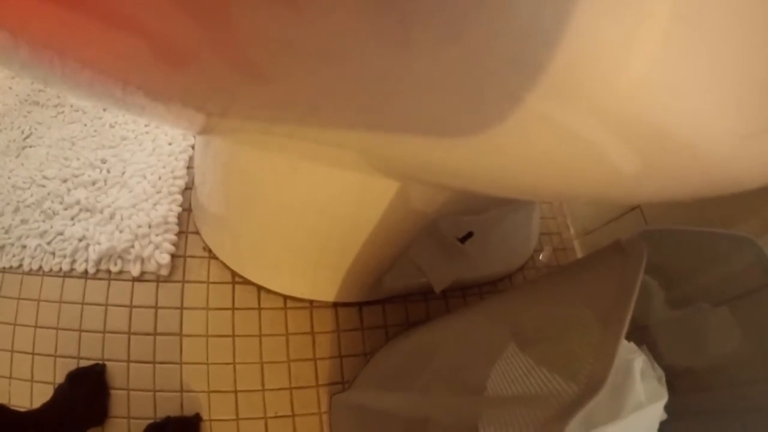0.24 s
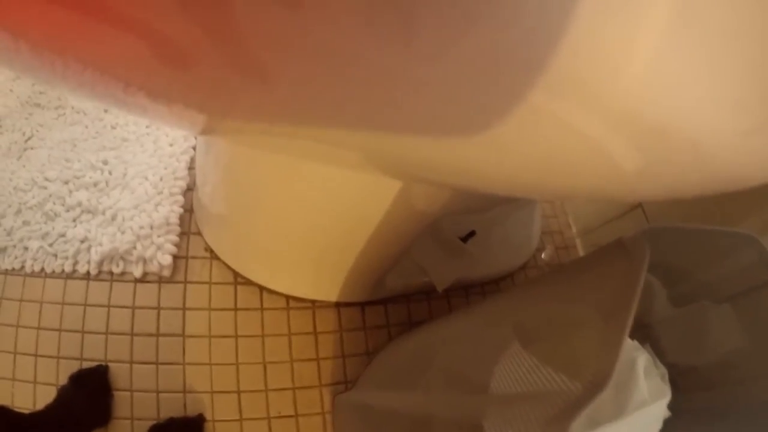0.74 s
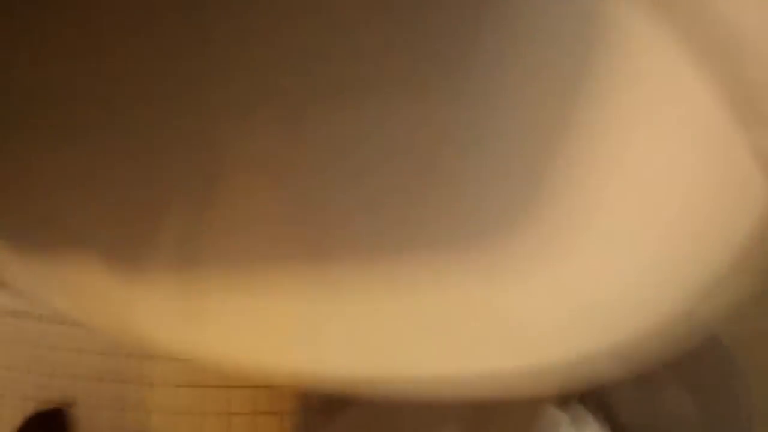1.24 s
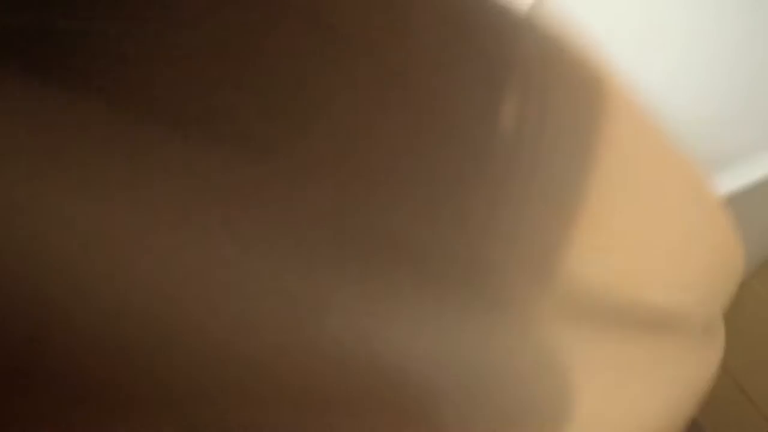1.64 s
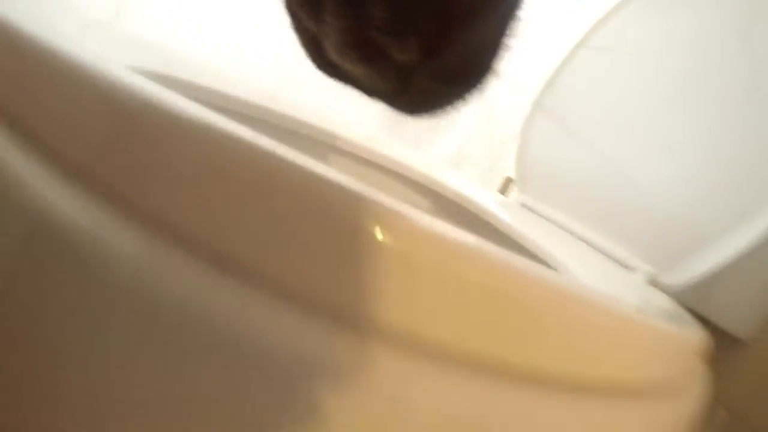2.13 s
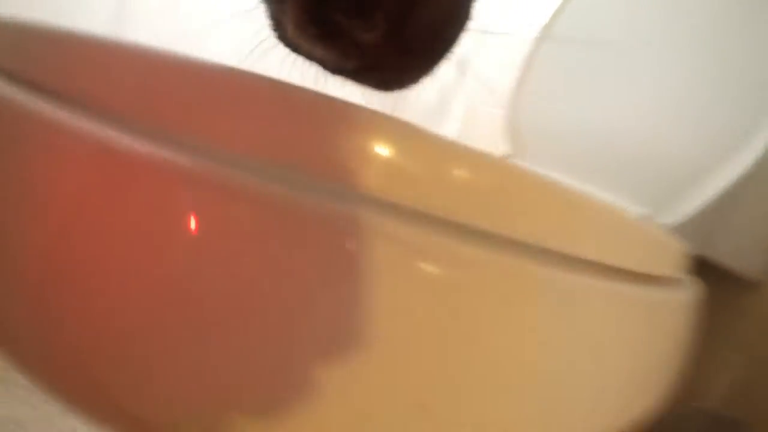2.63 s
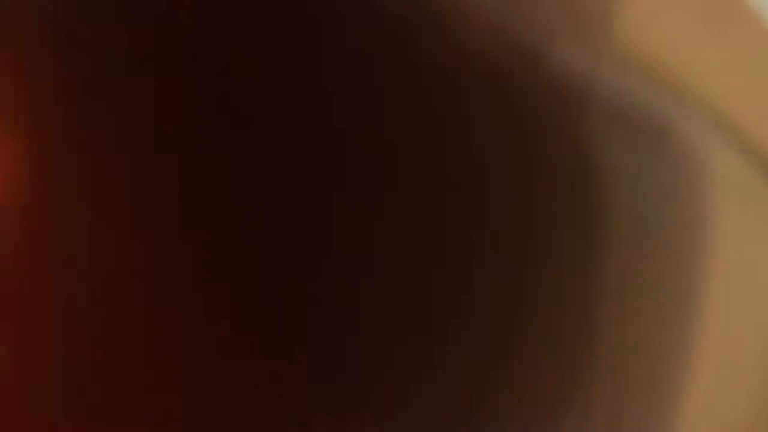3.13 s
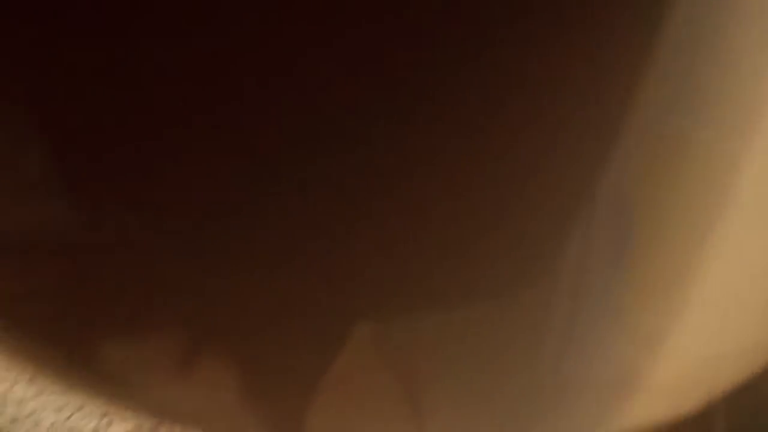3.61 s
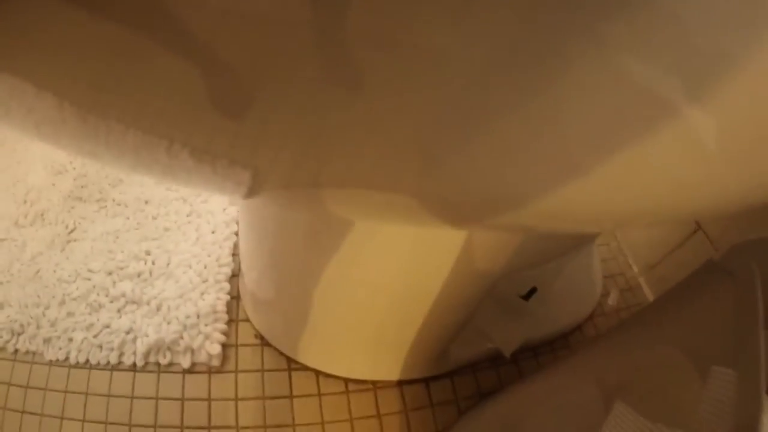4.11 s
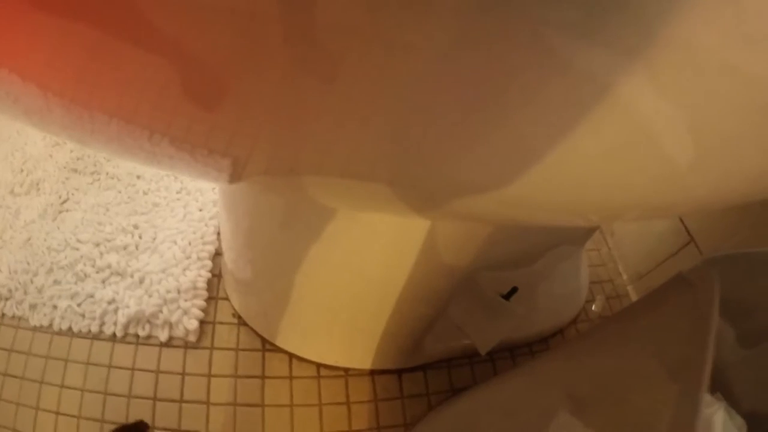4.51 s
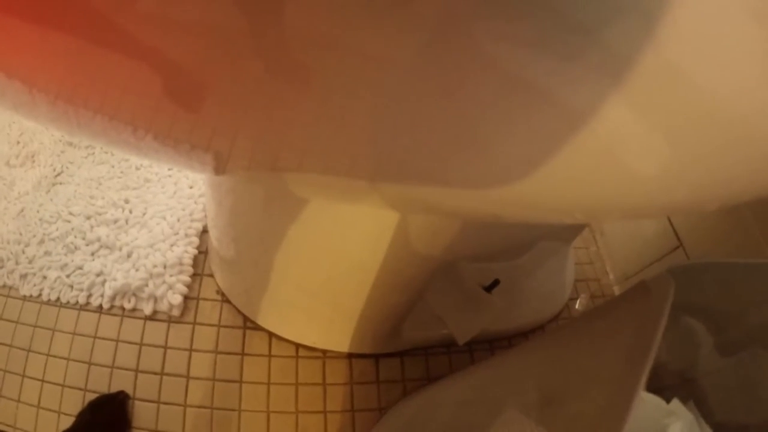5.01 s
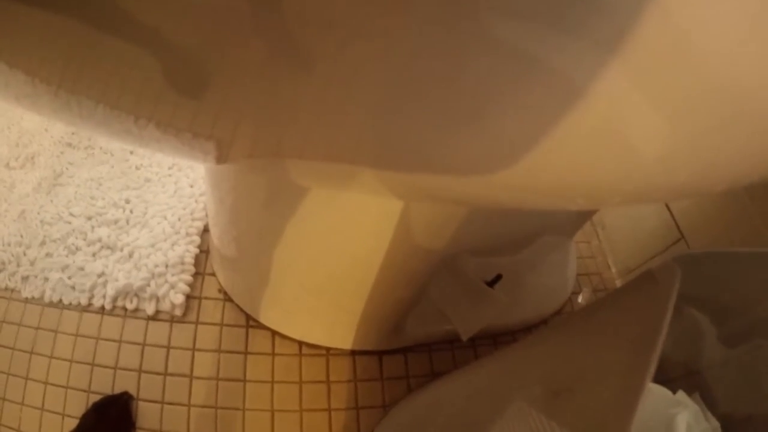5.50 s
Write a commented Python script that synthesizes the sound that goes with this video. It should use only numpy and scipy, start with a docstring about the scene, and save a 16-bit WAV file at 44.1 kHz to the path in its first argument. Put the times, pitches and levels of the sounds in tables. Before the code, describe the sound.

Right against a toilet bowl in a small tiled bathroom, a dog laps about three times a second with hollow wet pops and low bumps. The microphone's casing rubs the bowl, knocks and chatters on the rim, then goes nearly quiet with tiny wet smacks. A very hard knock overloads, a groaning scrape follows, and softer, swishing licks continue over handling rumble and faint hiss.

```python
"""Tiled bathroom, camera microphone right against a toilet bowl: a dog laps, about three licks a second.
Each lick is a slow low push, with ringing air-pocket pops or a swish of hollow, grainy noise.
The casing then rubs along the bowl, knocks on the rim as decaying modes, bounces, overloads the microphone
and chatters. Tiny bubbles smack faintly, more knocks land, a groaning scrape comes down the rim, and the
lapping goes on. Hand rumble, rustle and a faint steady hiss lie underneath throughout."""
import sys
import numpy as np
from scipy import signal
from scipy.fft import rfft, irfft
from scipy.io import wavfile

SR = 44100
rng = np.random.default_rng(int(sys.argv[2]) if len(sys.argv) > 2 else 0)


def bounce(signal):
    """Save signal as a 16-bit WAV file at the path given by the first command-line argument."""
    frames = np.transpose(np.atleast_2d(signal))
    limited = np.clip(frames, -1, 1)
    pcm = np.round(limited * 32767).astype(np.int16)
    wavfile.write(sys.argv[1], SR, pcm)


N = 253575
TIME = np.arange(N) / SR
BRIEF = TIME[:8192]  # time axis of one short sound, seconds


def amp(db):
    """Decibels to gain."""
    return 10 ** (np.asarray(db) / 20)


def unit_rms(x):
    """Scales to an rms of one."""
    return x / np.sqrt(np.mean(x ** 2) + 1e-20)


def unit_peak(x):
    """Scales to a peak of one."""
    return x / (abs(x).max() + 1e-20)


def noise(count=N):
    """White noise."""
    return rng.standard_normal(count)


def decay(t, t60):
    """A gain that falls by 60 dB in t60 seconds."""
    return amp(-60 * t / t60)


def add(mix, s, sound):
    """Mixes a sound in at s seconds."""
    part = mix[max(round(s * SR), 0):][:len(sound)]
    part += sound[:len(part)]


def spectrum_db(points, hz):
    """Reads a spectrum on a log-frequency axis."""
    f, db = np.transpose(points)
    return np.interp(np.log(hz + 1), np.log(f + 1), db)


def coloured(x, points, bumps=()):
    """Gives x a broad spectrum with resonant bumps on it, at an rms of one."""
    hz = np.fft.rfftfreq(len(x), 1 / SR)
    db = spectrum_db(points, hz)
    for centre, width, height_db in bumps:
        db = db + height_db * np.exp(-2 * ((hz - centre) / width) ** 2)
    return unit_rms(irfft(rfft(x) * amp(db), len(x)))


def click(points, corner_hz):
    """A causal (minimum-phase) click of the given spectrum, duller above the corner."""
    hz = abs(np.fft.fftfreq(len(BRIEF), 1 / SR))
    log_gain = np.log(amp(spectrum_db(points, hz)) / (1 + (hz / corner_hz) ** 2))
    return np.fft.ifft(np.exp(np.conj(signal.hilbert(log_gain)))).real


def wander(rate_hz):
    """Slow chance with an rms of one."""
    hz = np.fft.rfftfreq(N, 1 / SR)
    return unit_rms(irfft(rfft(noise()) * np.exp(-(hz / rate_hz) ** 2), N))


def grainy(grain_db, grain_hz=900):
    """Noise that comes in tiny clumps."""
    return noise() * amp(grain_db * wander(grain_hz))


def whistle(glide, width_hz):
    """Noise in one narrow resonance that follows a glide."""
    hz = np.interp(TIME, *np.transpose(glide))
    turn = np.exp(2j * np.pi * np.cumsum(hz) / SR)
    return unit_rms((turn * (wander(width_hz) + 1j * wander(width_hz))).real)


def stroke(start, end, db, growth_db=0, fade=0.028):
    """A gain that fades in, holds while growing by growth_db each second, and fades out."""
    outside = np.maximum(start - TIME, 0) + np.maximum(TIME - end, 0)
    held_db = db + growth_db * (np.clip(TIME, start, end) - start)
    return amp(held_db) * np.exp(-(outside / fade) ** 2)


def swell(s, half_length, db, shape=1.7):
    """A gain that rises to a peak at s seconds and falls again."""
    return amp(db) * np.exp(-abs((TIME - s) / half_length) ** shape)


# Licks at the bowl. Each row: time in seconds, push level in dB, push swing in Hz, swish delay in seconds,
# swish half-length in seconds, swish level in dB, draw-back level in dB.
LICKS = [(0.0, -15, 27.5, 0.038, 0.13, -51.5, -93), (0.337, -12.5, 24.5, -0.02, 0.034, -52.5, -62),
         (0.681, -14, 25.4, -0.018, 0.017, -46, -58), (4.137, -52, 25, -0.05, 0.2, -49, -57),
         (4.323, -27.5, 24.8, -0.074, 0.049, -40.5, -49), (4.633, -22, 24.1, 0.025, 0.091, -35, -51),
         (4.946, -15, 23, 0.021, 0.074, -32.5, -37), (5.267, -12, 22.2, 0.044, 0.041, -37, -37),
         (5.668, -14.5, 22.9, 0.039, 0.047, -34, -60)]
# Jolts of the hand on the camera. Each row: time in seconds, level in dB, swing in Hz.
JOLTS = [(0.88, -27.5, 33.3), (1.112, -16, 28.5), (1.383, -19, 45), (2.897, -35, 29), (3.226, -31, 30)]


def pushes(cycles=0.83, slop_db=-31):
    """Each push rocks the bowl and camera through a slow swing or two, with a dull slop under it."""
    slop_colour = [(60, 0.5), (130, 2.0), (300, -17.0), (700, -21.0), (1500, -29.5), (4000, -70.0)]  # (Hz, dB)
    slop = amp(slop_db) * coloured(noise(), slop_colour)
    out = np.zeros(N)
    for s, db, hz, *_ in LICKS + JOLTS:
        since = TIME - s
        swing = np.cos(2 * np.pi * hz * since)
        out += amp(db) * (swing + slop) * np.exp(-(since * hz / cycles) ** 2)
    return out


# Wet pops of the tongue. Each row: start in seconds, peak of the air pocket in dB, pitch in Hz,
# level of the splash relative to the pocket in dB.
POPS = [(0.016, -18.5, 890, -3), (0.035, -24, 790, -2.5), (0.297, -36, 1093, -8), (0.347, -17, 990, 1),
        (0.363, -21.5, 1100, -2), (0.374, -29.5, 950, -16), (0.455, -36.5, 2470, -14.5),
        (0.589, -39, 990, -7), (0.639, -23.5, 1120, -14.5), (0.692, -11.5, 1100, -8.5),
        (0.715, -17.5, 1050, -9), (0.771, -31.5, 1100, -8), (4.123, -36, 1660, -3)]
# Colour of the splash in the bowl. Each row: frequency in Hz, level in dB.
SPLASH_COLOUR = [(180, -3), (300, -16.5), (469, -3.5), (630, -7.5), (778, -0.5), (1060, -1.5),
                 (1930, -12.5), (2300, -7.5), (3090, -43), (5000, -40), (6500, -57), (11000, -120)]


def pops(rise_s=0.00048, splash_t60=0.04):
    """A pocket of air under the tongue rings for a few cycles; a splash builds and dies in the bowl."""
    out = np.zeros(N)
    pocket_shape = (BRIEF / rise_s) ** 2 * np.exp(-BRIEF / rise_s)
    splash_shape = decay(BRIEF, splash_t60) * (1 - np.exp(-BRIEF / rise_s))
    for s, db, hz, splash_db in POPS:
        pocket = unit_peak(pocket_shape * np.sin(2 * np.pi * hz * BRIEF))
        splash = coloured(noise(len(BRIEF)), SPLASH_COLOUR) * splash_shape
        add(out, s, amp(db) * (pocket + amp(splash_db) * splash))
    return out


def tongue():
    """Level of the tongue's sliding: a swish with each lick and a softer draw-back after it."""
    draw_back_s, draw_back_share = 0.21, 0.23  # lag after the swish; half-length as a share of the lick's span
    longest_lick_s = 0.83  # after a longer pause the tongue still draws back at this pace
    starts = [row[0] for row in LICKS]
    spans = np.minimum(np.diff(starts, append=np.inf), longest_lick_s)
    level = np.zeros(N)
    for (s, _, _, delay, half, swish_db, back_db), span in zip(LICKS, spans):
        level += swell(s + delay, half, swish_db)
        level += swell(s + delay + draw_back_s, draw_back_share * span, back_db)
    return level


# Colour of the tongue's hiss. Each row: frequency in Hz, level in dB.
SWISH_COLOUR = [(120, -46), (200, -17.5), (360, -21.5), (677, -18.5), (1200, -7), (1960, -2.5), (2290, 2),
                (3530, -11), (4120, -11.5), (4660, -17.5), (6060, -21), (6750, -11), (8000, -44),
                (10400, -89), (17600, -120)]
# Colour of the fine fizz, shared with the rub. Each row: frequency in Hz, level in dB.
FIZZ_COLOUR = [(6000, -23.5), (7800, -1), (9200, -7.5), (11000, 0.5), (13200, -10), (14500, -6.5),
               (16000, -8)]
# Resonances of the hollow, shared with the rustle. Each row: centre in Hz, width in Hz, height in dB.
HOLLOW = [(1131, 240, 3), (2340, 110, 2), (3073, 480, 2.5), (4148, 510, 4.5), (5330, 1800, 2),
          (7170, 170, 5.5)]


def swishes(fizz_db=-17, flutter_db=2.0):
    """The wet tongue slides: grainy hiss in a hollow, with a fine fizz on top."""
    body = coloured(grainy(grain_db=1.5), SWISH_COLOUR, HOLLOW)
    fizz = amp(fizz_db) * coloured(grainy(grain_db=2.0), FIZZ_COLOUR)
    return (body + fizz) * tongue() * amp(flutter_db * wander(30))


# Movement of the hand on the camera. Each row: time in seconds, amount of movement in dB.
HAND = [(0, -39), (1.05, -40.5), (1.23, -32.5), (1.42, -46.5), (1.9, -59.5), (2.25, -61), (2.83, -52),
        (3.2, -47.5), (3.4, -59.5), (4.6, -44.5), (5.75, -35)]
# Faint brushes of fur and fingers. Each row: time in seconds, level in dB before the rustle's own trim,
# half-length in seconds.
BRUSHES = [(1.574, -54.5, 0.054), (2.06, -67.5, 0.019), (2.357, -62.5, 0.012), (2.471, -65, 0.022),
           (2.611, -64, 0.015), (2.802, -65.5, 0.057), (3.058, -63.5, 0.077), (3.216, -53.5, 0.012),
           (4.845, -43, 0.013)]
# Colour of the rustle. Each row: frequency in Hz, level in dB.
RUSTLE_COLOUR = [(120, -25.5), (200, -7), (277, -9), (880, -13), (1290, -7.5), (2060, -4.5), (2510, -9),
                 (3470, -15.5), (4010, -16.5), (15000, -30)]
# Colour of the rumble. Each row: frequency in Hz, level in dB.
RUMBLE_COLOUR = [(10, 1), (22, 11.5), (40, 1.5), (65, -3), (100, -16), (160, -23.5), (300, -36.5),
                 (600, -43.5), (1500, -72)]
# Colour of the steady hiss. Each row: frequency in Hz, level in dB.
FLOOR_COLOUR = [(59, -34.5), (100, -8.5), (434, -22.5), (1960, -13.5), (3110, -20), (3530, -26.5),
                (3920, -18.5), (4940, -28), (11700, -38.5), (15000, -55)]


def handling(rustle_db=-2.0, rumble_db=5, flutter_db=1.0, grip_db=-30, rustle_per_rumble=0.7, floor_db=-74.5):
    """The hand on the camera rustles and rumbles over a faint steady hiss."""
    hand_db = np.interp(TIME, *np.transpose(HAND))
    grip = amp(grip_db + rustle_per_rumble * hand_db)  # rustle grows less in dB than the movement does
    brushes = sum(swell(s, half, db) for s, db, half in BRUSHES)
    rustle = coloured(grainy(grain_db=2.0), RUSTLE_COLOUR, HOLLOW) * amp(rustle_db + flutter_db * wander(35))
    rumble = coloured(noise(), RUMBLE_COLOUR) * amp(hand_db + rumble_db)
    floor = amp(floor_db) * coloured(noise(), FLOOR_COLOUR)
    return rustle * (grip + brushes) + rumble + floor


# Small bright ticks. Each row: start in seconds, level in dB before the common trim.
TICKS = [(0.808, -38.5), (2.3486, -46.5), (2.4851, -39), (2.9637, -26.5), (2.9851, -32.5), (3.4878, -56),
         (4.4797, -38), (4.8777, -30.5), (4.92, -27.5), (5.519, -27)]
# Colour of the ticks. Each row: frequency in Hz, level in dB.
TICK_COLOUR = [(800, -16), (2000, -0.5), (4000, 7.5), (6500, 1.5), (9000, -3.5), (15000, -27)]


def ticks(tail_db=-11, trim_db=-3, tail_t60=0.04):
    """Tiny bright clicks, each with a short tail of decaying noise."""
    out = np.zeros(N)
    tick = unit_peak(click(TICK_COLOUR, 17000))
    for s, db in TICKS:
        tail = coloured(noise(len(BRIEF)), TICK_COLOUR) * amp(tail_db) * decay(BRIEF, tail_t60)
        add(out, s, amp(db + trim_db) * (tick + tail))
    return out


# Colour of the casing rubbing on the bowl. Each row: frequency in Hz, level in dB.
RUB_COLOUR = [(120, -45), (200, -8), (281, -22.5), (908, -16.5), (2120, -1.5), (2290, 0), (2590, -10.5),
              (4180, -11.5), (4730, -24), (6860, -23.5), (8000, -34), (10400, -62.5), (17600, -120)]


def rub(body_db=-1, fizz_db=-32, sheen_db=2, squeak_db=-7, catch_s=1.1555, catch_db=10, catch_time=0.0025,
        judder_db=0.4):
    """The casing rubs along the bowl as it is lifted: rough noise, a falling squeak and one brief catch."""
    end_s = 1.238
    touch = stroke(0.97, end_s, -40.5, fade=0.025)  # a light touch
    press = stroke(1.019, end_s, -32, growth_db=22, fade=0.007)  # a firm press that grows
    pressure = touch + press
    squeak = whistle([(1.05, 2410), (1.15, 2330), (1.21, 2044)], width_hz=130)  # (s, Hz)
    body = amp(body_db) * coloured(grainy(grain_db=1.5), RUB_COLOUR) + amp(squeak_db) * squeak
    sheen_colour = [(2000, -31.0), (4100, 0.0), (5500, -3.0), (6900, 3.5), (8500, -19.5), (12000, -42.0)]  # (Hz, dB)
    sheen = coloured(grainy(grain_db=4.5), sheen_colour)
    fizz = coloured(grainy(grain_db=0.5), FIZZ_COLOUR) + amp(sheen_db) * sheen
    fastest = swell(1.087, 0.03, -38)  # the fizz swells where the slide is fastest
    catch_shape = np.exp(-((TIME - catch_s) / catch_time) ** 2)
    catch = amp(catch_db * catch_shape + judder_db * wander(110))
    return (body * pressure + fizz * (amp(fizz_db) * pressure + fastest)) * catch


# Knocks on the rim. Each row: start in seconds, crack level in dB, brightness corner in Hz, thud level in dB,
# contact time in seconds, ring level in dB, number of contacts, first gap in seconds, share (0-1) of the gap
# beyond the shortest that each bounce keeps, blow loss in dB and ring loss in dB at the first bounce.
KNOCKS = [(1.259, 5.5, 3976, 13, .00095, -15, 2, .0122, .5, 5, -1.5),
          (1.279, 1, 6050, -17, 0.0017, 1.5, 3, 0.01, 0.47, 18, 6.5),
          (1.3275, -7, 3300, -2, 0.00079, -15, 3, 0.015, 0.65, 11, 6),
          (1.5496, -28, 6070, -34.5, 0.0015, -61, 1, 0, 0.2, 0, 0),
          (1.564, -46, 2000, -20.5, 0.0016, -29.5, 2, 0.04, .5, 1.5, 20.5),
          (1.6302, -2, 2720, -4.5, 0.0007, -17, 2, .0099, .5, 13.5, 14),
          (1.6795, -15.5, 2150, -18, 0.00049, -24, 4, .0098, 0.53, 6, 14),
          (3.254, 10.5, 8370, 11, 0.000865, -6, 6, .0326, .46, 12, 8),
          (3.7819, -13.5, 4200, -20.5, 0.00074, -12, 5, 0.011, 0.75, 10, 5.5),
          (3.919, -9.5, 1780, -20.5, 0.0015, -24, 1, 0, 0, 0, 0),
          (4.01, -32.5, 800, -30.5, 0.0017, -56, 1, 0, 0, 0, -2)]


def contacts(shortest_gap_s=0.0055, dulling=0.49, thud_loss_share=0.85):
    """Each knock may bounce: contacts crowd towards the shortest gap and grow duller, with losses per row."""
    for s, crack_db, bright_hz, thud_db, contact, ring_db, count, gap, kept, loss_db, ring_loss_db in KNOCKS:
        for k in range(round(count)):
            spent = np.log2(k + 1)
            bounce_crack_db = crack_db - loss_db * spent
            bounce_thud_db = thud_db - thud_loss_share * loss_db * spent
            bounce_ring_db = ring_db - ring_loss_db * spent
            yield s, bounce_crack_db, bright_hz / (k + 1) ** dulling, bounce_thud_db, contact, bounce_ring_db
            s += shortest_gap_s + (gap - shortest_gap_s) * kept ** k


# Colour of a crack on the rim, shared with the chatter. Each row: frequency in Hz, level in dB.
CRACK_COLOUR = [(150, -9), (400, 4.5), (900, 2), (1400, -2.5), (2200, 6.5), (2900, -3.5), (3700, -3),
                (4800, -6.5), (5800, -4), (7500, -11.5), (9500, -19.5), (15000, -23)]
# What the knocks ring with. Each row: frequency in Hz, level relative to the ping in dB, t60 in seconds.
RING_MODES = [(1100, -15, 0.018), (1690, -13.5, 0.038), (1970, -19, 0.11), (2224, -28.5, 0.11),
              (2560, -30, 0.063), (4200, -22.5, 0.03), (5580, -45, 0.06)]
# Low modes of the casing, added to the thud. Each row: frequency in Hz, level relative to the thud's shove
# in dB, t60 in seconds.
CASE_MODES = [(234.7, -19.5, 0.031), (343, -22, 0.041), (398, -25.5, 0.029)]
# Colour of the edge of a very hard blow. Each row: frequency in Hz, level in dB.
BITE_COLOUR = [(300, -13.5), (1300, -7), (1950, 6), (3000, -8.5), (4000, 2.5), (6000, 4.5), (8000, -8.5),
               (11500, -9), (15000, -8)]


def ringing(modes, t):
    """Sums decaying sine modes over the time axis t."""
    return sum(amp(db) * decay(t, t60) * np.sin(2 * np.pi * hz * t) for hz, db, t60 in modes)


def gritty(colour, grit_db, grit_t60):
    """A click roughened by a decaying sprinkle of noise."""
    grit = noise(len(BRIEF)) * amp(grit_db) * decay(BRIEF, grit_t60)
    grit[0] = 1
    return unit_peak(signal.fftconvolve(grit, colour)[:len(BRIEF)])


def knocks(thud_lag=0.0011, ping_hz=1880, ping_t60=0.015, stiffening=0.1, rise_s=0.00021,
           spring_hz=52, spring_q=0.65, shove_share=0.55, bite_db=-23, bite_growth=2.8, bite_time=0.0014):
    """Each contact cracks, shoves the casing and sets its modes ringing."""
    out = np.zeros(N)
    modes = ringing(RING_MODES, BRIEF)
    w = 2 * np.pi * spring_hz
    # the grip gives way, so the shove swings back
    spring = signal.bilinear([1, 0, 0], [1, w / spring_q, w * w], SR)
    late = np.maximum(BRIEF - thud_lag, 0)
    case = ringing(CASE_MODES, late)
    for s, crack_db, bright_hz, thud_db, contact, ring_db in contacts():
        crack = gritty(click(CRACK_COLOUR, bright_hz), grit_db=-13, grit_t60=0.018)
        u = late / (shove_share * contact)
        shove = u ** 3 * np.exp(-u)
        thud = unit_peak(signal.lfilter(*spring, shove)) + case
        hz = ping_hz * amp(ring_db * stiffening)  # a harder contact is stiffer and pings higher
        ping = decay(BRIEF, ping_t60) * np.sin(2 * np.pi * hz * BRIEF)
        ring = unit_peak((ping + modes) * (1 - np.exp(-BRIEF / rise_s)))
        bite = coloured(noise(len(BRIEF)), BITE_COLOUR) * np.exp(-(BRIEF / bite_time) ** 2)
        bite *= amp(bite_db + bite_growth * crack_db)  # grows steeply with the force
        add(out, s, amp(crack_db) * crack + bite + amp(thud_db) * thud + amp(ring_db) * ring)
    return out


def chatter(start=1.712, gap=0.0075, first_db=-35.0, step_db=-0.5, bright_hz=3000, count=9):
    """The casing chatters on the rim in a quick run of light, gritty taps of uneven timing and force."""
    out, colour = np.zeros(N), click(CRACK_COLOUR, bright_hz)
    for k, (early, size) in enumerate(rng.standard_normal((count, 2))):
        tap = gritty(colour, grit_db=-10, grit_t60=0.019)
        add(out, start + gap * (k + 0.135 * early), amp(first_db + k * step_db + 2 * size) * tap)
    return out


def droplets(start=2.2, end=3.05, base_db=-60, spread_db=4.5, cycles=5, count=40):
    """Faint wet smacks of the muzzle: tiny bubbles that burst within a few cycles."""
    out = np.zeros(N)
    for when, pitch, size in rng.random((count, 3)):
        turns = 1300 * 5 ** pitch * BRIEF  # cycles so far, at 1300 to 6500 Hz
        bubble = np.exp(-turns / cycles) * (1 - np.exp(-turns / 2)) * np.sin(2 * np.pi * turns)
        level_db = base_db - spread_db * np.log(size + 0.065)  # many faint, a few louder
        add(out, start + when * (end - start), amp(level_db) * bubble)
    return out


# Colour of the scrape's hiss. Each row: frequency in Hz, level in dB.
SCRAPE_COLOUR = [(290, -26), (500, 0), (1580, -6), (2880, -3), (3270, -12.5), (4230, -6.5), (4670, -18.5),
                 (5620, -7.5), (8990, -31), (10400, -22), (15000, -35)]
# Glide of the groan. Each row: time in seconds, pitch in Hz.
GROAN_GLIDE = [(3.45, 270.6), (3.6, 300), (3.8, 324), (3.9, 384)]


def scrape(judder_db=2, waver_db=5.0, hiss_hold_s=0.019, slip_phase_s=4.7, slip_period_s=0.113, slip_swing_db=3.8):
    """The casing scrapes down the rim: a growing hiss and a rising groan that sticks and slips evenly."""
    start_s, end_s = 3.467, 3.925
    slip = np.cos(2 * np.pi * (TIME - slip_phase_s) / slip_period_s)
    hiss = coloured(grainy(grain_db=1.5), SCRAPE_COLOUR, [(6630, 250, 3.5)]) * amp(judder_db * wander(180))
    groan = whistle(GROAN_GLIDE, width_hz=104) * amp(waver_db * wander(24) + slip_swing_db * slip)
    pressed_hiss = hiss * stroke(start_s, end_s + hiss_hold_s, -57.5, growth_db=24)
    return pressed_hiss + groan * stroke(start_s, end_s, -44.5)


def bathroom(x, wet_db=-36, t60=0.12):
    """A faint short tail from the tiled walls, as decaying coloured noise."""
    t = TIME[:SR // 2]
    colour = [(60, -3), (250, 5), (700, -1.5), (2000, -1.0), (4000, -13), (14000, -20)]  # (Hz, dB)
    tail = coloured(noise(len(t)), colour) * decay(t, t60)
    return x + amp(wet_db) * signal.fftconvolve(x, tail / np.linalg.norm(tail))[:N]


def scene():
    """Licks, knocks and handling close to the microphone; the short sounds also stir the room."""
    hits = bathroom(pops() + ticks() + droplets() + knocks() + chatter())
    return (hits + pushes() + swishes() + rub() + scrape() + handling())[None]


def record(dry, ceiling=0.965, edge_hz=15500):
    """The microphone overloads on the hardest knocks; then the band limit."""
    clipped = dry / (1 + (dry / ceiling) ** 8) ** (1 / 8)
    band = signal.firwin(801, edge_hz, window=("kaiser", 8), fs=SR)
    return signal.oaconvolve(clipped, band[None], "same")


dry = scene()
out = record(dry)
bounce(out)
```